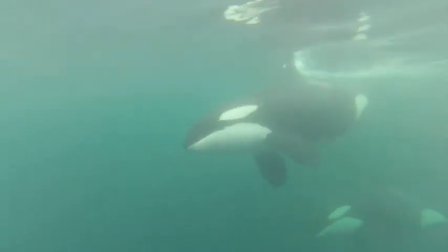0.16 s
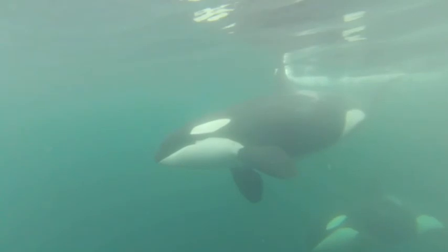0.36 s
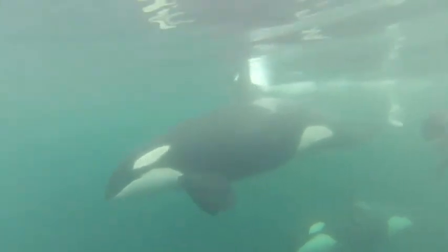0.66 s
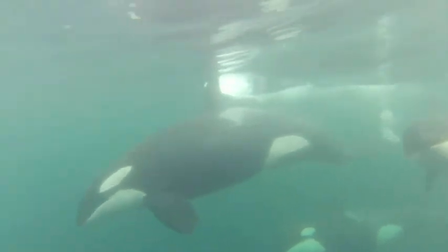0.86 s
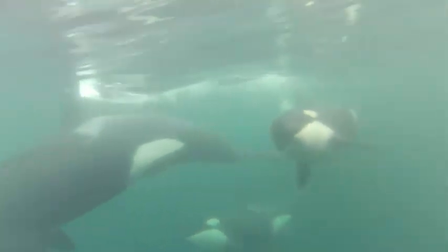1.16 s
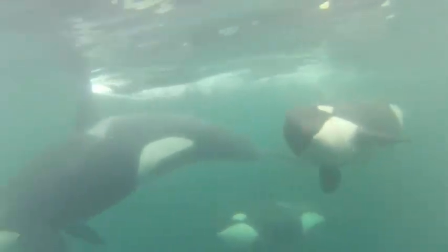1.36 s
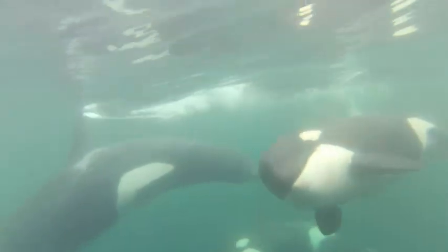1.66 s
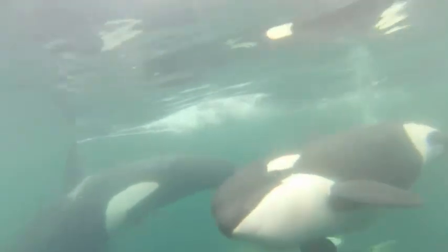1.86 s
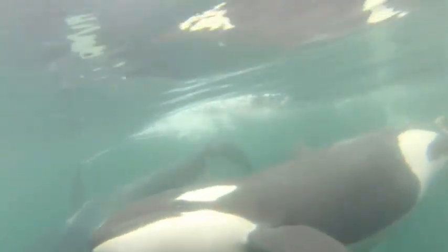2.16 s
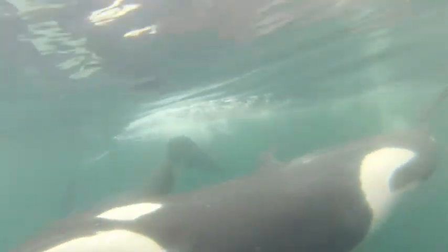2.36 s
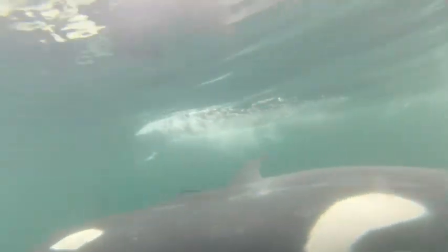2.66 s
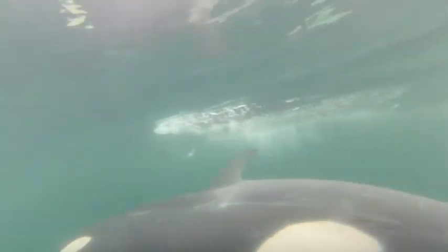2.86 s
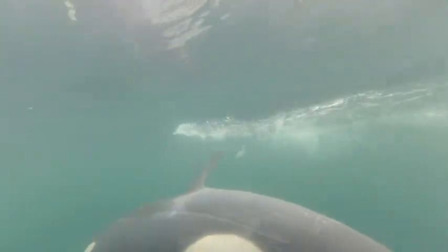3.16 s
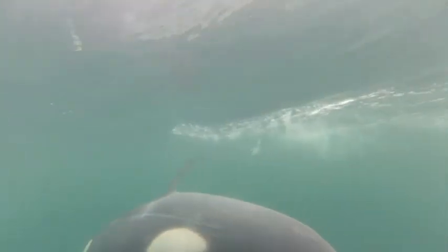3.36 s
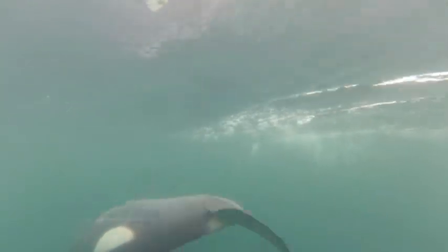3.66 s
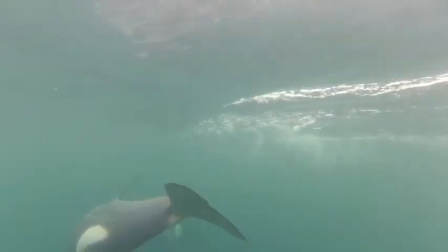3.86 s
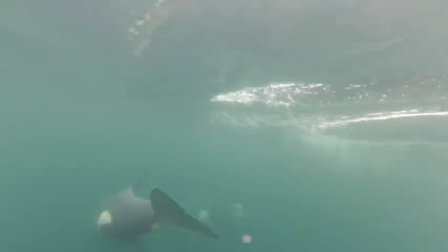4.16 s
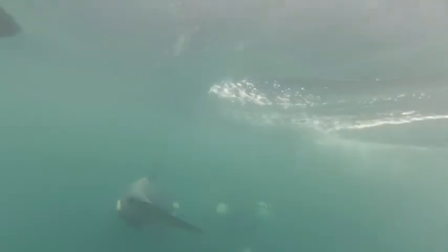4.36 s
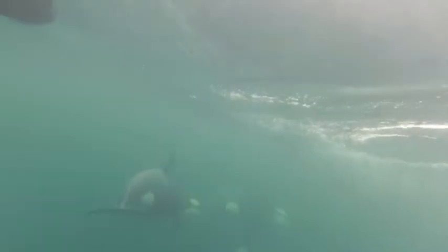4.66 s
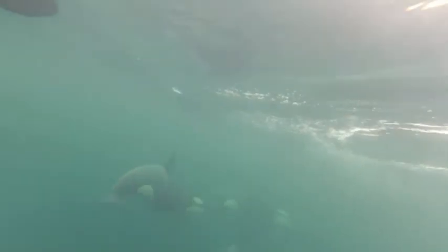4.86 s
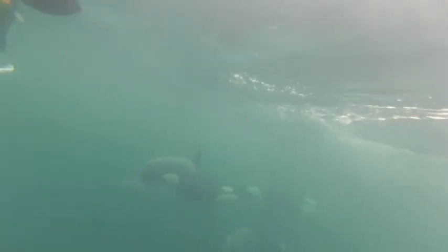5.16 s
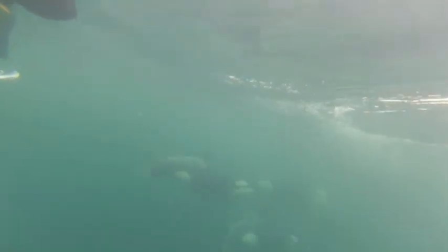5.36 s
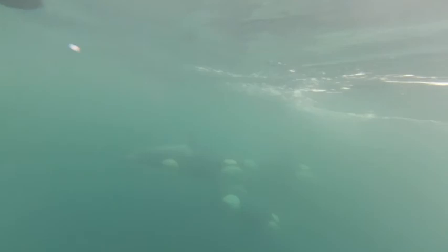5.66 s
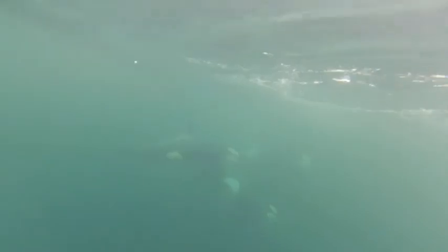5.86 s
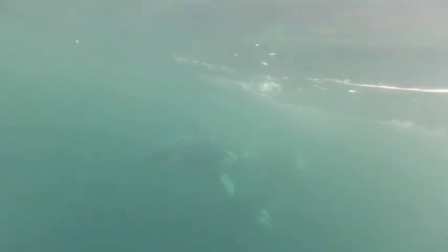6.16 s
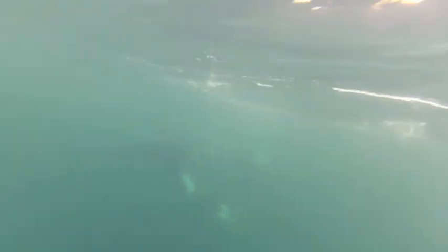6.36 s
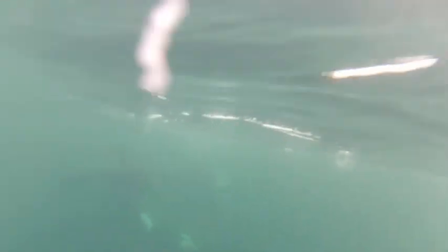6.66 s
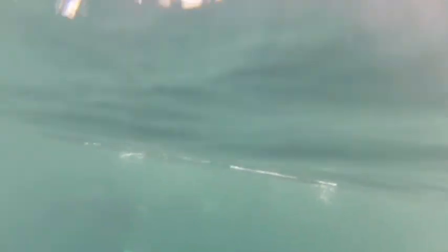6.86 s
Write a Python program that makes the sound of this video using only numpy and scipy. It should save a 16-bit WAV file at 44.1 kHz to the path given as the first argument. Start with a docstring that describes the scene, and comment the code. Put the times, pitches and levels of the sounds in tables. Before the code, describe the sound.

Two overlapping trains of sharp whale clicks quicken and stop, leaving low drumming water, sparse bubbles and knocks before a rattling splash at the surface.

```python
"""Killer whales swim past a small camera in its watertight case, its microphone inside. At first a slow and a fast
sonar train close in, clicks snapping in the treble and ringing the case; then two short far trains pass.
Bubbles pop and knocks land on and off; past the middle two faint whistles glide far off. At the end stray
clicks come and the camera breaks the surface in a rattle of pops, slaps and crackle of swelling, dying sines.
Throughout, filtered noise drums low on the mount and washes the case, and the electronics whine and hiss."""
import sys
import numpy as np
from scipy import signal
from scipy.fft import rfft, irfft
from scipy.io import wavfile
from scipy.ndimage import uniform_filter1d

SR = 44100
rng = np.random.default_rng(int(sys.argv[2]) if len(sys.argv) > 2 else 0)


def wav_record(signal):
    """Record a signal, one row per channel, as 16-bit PCM in the file named by sys.argv[1]."""
    frames = np.transpose(np.atleast_2d(signal))
    bounded = np.clip(frames, -1, 1)
    # unit amplitude maps onto the largest positive 16-bit level
    quanta = np.round(bounded * 32767).astype(np.int16)
    wavfile.write(sys.argv[1], SR, quanta)


N = 309566


def gain_of(db):
    """Decibels to gain."""
    return 10 ** (np.asarray(db) / 20)


def evened(x):
    """Scales to rms 1."""
    return x / np.sqrt(np.mean(x ** 2) + 1e-20)


def level_at(t, points):
    """Straight lines through the points (s, value)."""
    return np.interp(t, *np.transpose(points))


def smooth_noise(size, span):
    """Slow random wander of rms 1, averaged over span samples."""
    return evened(uniform_filter1d(rng.standard_normal(size), span))


def add(mix, s, sound):
    """Mixes a sound in at s seconds."""
    part = mix[max(round(s * SR), 0):][:len(sound)]
    part += sound[:len(part)]


def ring(hz, t60, rise=0.00041, glide=0., size=4000):
    """A dying sine with a soft start; its pitch climbs by the share 2 * glide within t60."""
    t = np.arange(size) / SR
    swell = (1 - np.exp(-t / rise)) ** 2
    return swell * gain_of(-60 * t / t60) * np.sin(2 * np.pi * hz * t * (1 + glide * t / t60))


def swells(peaks, rise_db_per_s, fall_db_per_s):
    """Level in dB that climbs to each peak (s, dB) and sinks after it."""
    t = np.arange(N) / SR
    slopes = [db - np.where(t < s, rise_db_per_s * (s - t), fall_db_per_s * (t - s)) for s, db in peaks]
    return np.max(slopes, axis=0)


# single stray clicks: start_s, snap_db (treble), case_db (ring of the case)
STRAY_CLICKS = [(6.112, -29, -39), (6.148, -32, -33), (6.2124, -29, -37.5), (6.3543, -25.5, -35.5),
                (6.4, -14, -63), (6.4492, -27, -43), (6.6519, -17, -31), (6.7717, -16.5, -37),
                (6.8849, -20.5, -51)]
# the four sonar trains, slow whale, fast whale that ends in a buzz, two short far ones: time_s, clicks_per_s
TRAIN_PACES = [
    [(0.0136, 13.98), (0.31, 13.28), (0.34, 15.15), (0.45, 13.92), (0.64, 17.89), (0.69, 15.86),
     (0.79, 16.61), (0.87, 19.56), (1.12, 16.08), (1.15, 18.6), (1.26, 18.04), (1.66, 19.53), (1.71, 23.46),
     (1.775, 22.83)],
    [(0.1179, 37.59), (0.27, 36.38), (0.49, 42.46), (1.02, 50.68), (1.19, 57.08), (1.31, 65.29),
     (1.34, 62.23), (1.37, 50.94), (1.39, 28.05), (1.42, 44.27), (1.51, 49.16), (1.53, 53.64),
     (1.61, 15.43), (1.63, 33.95), (1.71, 47.53), (1.77, 39.73), (1.8, 45.82), (1.86, 83.64), (1.88, 68.93),
     (1.915, 131.11)],
    [(2.2325, 21.64), (2.335, 22.8), (2.45, 48)],
    [(3.0452, 12.3), (3.28, 22.04), (3.3, 18.62), (3.48, 26.43), (3.584, 23.75)],
]
# loudness of each train as the whale nears, aims and turns away: time_s, snap_db, case_db
TRAIN_LOUDNESS = [
    [(.01, -26, -19.5), (.25, -31.5, -20.5), (.5, -19.5, -17), (1.0, -10.5, -14.5), (1.4, -5.5, -17.5),
     (1.55, -4.5, -16), (1.72, -8.5, -16.5), (1.775, -15, -18.5)],
    [(.12, -28, -70), (.48, -34, -58), (.62, -33, -34.5), (1.05, -28, -37), (1.4, -22, -27.5),
     (1.56, -8.5, -18.5), (1.77, -10.5, -21.5), (1.83, -12, -18.5), (1.915, -37.5, -36)],
    [(2.23, -40, -23), (2.28, -38, -25), (2.33, -55, -35.5), (2.45, -56, -41)],
    [(3.04, -59, -41.5), (3.35, -53, -34), (3.47, -58, -33), (3.585, -62, -41)],
]
# extra ring of four case modes as clicks come from other sides: time_s, knock_db, brightest_db, lowest_db, main_db
CASE_SIDES = [(0, 9, -2, -0.5, 2.5), (.7, 2, 8, -3.5, 1.5), (1.9, 0, 12.5, -6, 3.5),
              (2.2, -11, -15, -16, 1), (3.2, 14, -18, 7, 2.5), (6.1, 13.5, 28, 2, 2.5)]
# resonances of the treble snap: pitch_hz, width_hz, level_db, before each click's own shade
SNAP_RESONANCES = [(5960, 540, -21.5), (7050, 350, -17.5), (8180, 710, -12), (9780, 736, -4.5),
                   (10730, 850, -4.5), (11740, 1590, 9), (13860, 820, -5.5)]
OFF_AXIS, OFF_AXIS_HZ = 0.38, 6500  # dB gained by the snap below this pitch for each dB a click weakens
STRAY_TOP_DB = -9  # stray clicks are duller in the two highest resonances
SNAP_RISE_S, WALL_LAG_S, WALL_SHARE = 0.00016, 0.00043, 0.13


def sonar():
    """Each click is a double treble snap of slightly changing colour, and it rings the case."""
    out = np.zeros(N)
    rows = np.vstack([STRAY_CLICKS, *map(train, TRAIN_PACES, TRAIN_LOUDNESS)])
    snap_hz, width, peak_db = np.transpose(SNAP_RESONANCES)[..., None]
    colours_db = 3 * rng.standard_normal((len(rows), len(snap_hz)))
    colours_db[:len(STRAY_CLICKS), -2:] += STRAY_TOP_DB
    drifts = .02 * rng.standard_normal((len(rows), len(snap_hz), 1))
    rings, hz = case(), np.array(CASE_MODES)[:, 0]
    when, knock_db, bright_db, low_db, main_db = np.transpose(CASE_SIDES)
    # each click shades the modes at random, all but the main one and its neighbour
    shades_db = 2 * rng.standard_normal((len(rows), len(hz))) * (abs(hz - hz[2]) > 100)
    off_axis = 1 - OFF_AXIS * (snap_hz[:, 0] < OFF_AXIS_HZ)
    for (s, snap_db, case_db), colour_db, drift, shade_db in zip(rows, colours_db, drifts, shades_db):
        snaps = gain_of(peak_db) * ring(snap_hz * (1 + drift), 2.284 / width, rise=SNAP_RISE_S, size=600)
        snap = gain_of(snap_db * off_axis + colour_db) @ snaps
        add(out, s + 0.00017, snap)
        add(out, s + 0.00016 + WALL_LAG_S, WALL_SHARE * snap)  # second path, through the case wall
        add(out, s + .0016, .15 * snap)  # a later, weak repeat
        side_db = np.where(hz > 3e3, np.interp(s, when, bright_db), np.interp(s, when, knock_db) * (hz == hz[5]))
        side_db[[0, 2]] = np.interp(s, when, low_db), np.interp(s, when, main_db)
        add(out, s + 0.000067, gain_of(case_db + side_db + shade_db) @ rings)
    return out


def train(pace, loudness):
    """A click at each whole turn of the click rate: rows of start_s, snap_db, case_db."""
    (s, rate), (when, snap_db, case_db) = np.transpose(pace), np.transpose(loudness)
    t = np.arange(s[0], s[-1], 1 / SR)
    turns = np.cumsum(np.interp(t, s, rate)) / SR
    at = np.interp(np.arange(int(turns[-1]) + 1), turns, t)
    return np.transpose([at, np.interp(at, when, snap_db), np.interp(at, when, case_db)])


# modes of the case around the microphone: pitch_hz, swing (inward if negative), t60_s
CASE_MODES = [(300, 0.45, 0.017), (551, -1.825, 0.0074), (620, 0.91, 0.032), (803, 0.024, 0.026),
              (1292, -0.092, 0.023), (1737, -0.161, 0.015), (2370, 0.025, 0.012), (3833, 0.0535, 0.0056)]
BUILD_CYCLES, BUILD_S = .03, .0001  # time constant of the build-up: cycles of the mode, plus seconds


def case():
    """The rings of the case modes, one a row; low modes take longer to build up."""
    return np.array([swing * ring(hz, t60, rise=BUILD_CYCLES / hz + BUILD_S, size=2200)
                     for hz, swing, t60 in CASE_MODES])


# single bubbles at the case: start_s, level_db, pitch_hz
BUBBLES = [(1.216, -25, 778), (2.075, -25, 526), (2.096, -30, 383), (2.915, -43, 2190), (4.292, -45, 1240),
           (4.49, -48, 1370), (4.6003, -36, 468), (4.898, -51, 1710), (5.698, -44, 3680),
           (5.712, -41, 3420), (5.787, -44, 2720), (4.881, -46, 1320), (4.9616, -39.5, 1660),
           (5.5313, -32, 614), (5.606, -39.5, 1760), (5.611, -20.5, 458), (5.7663, -27.5, 630),
           (5.807, -40.5, 3560), (5.978, -21, 355), (6.1499, -31, 615), (6.174, -32, 620), (6.4, -24, 3590),
           (6.4542, -8, 2840), (6.4816, -29, 3530), (6.494, -24, 630), (6.4983, -11.5, 6860),
           (6.5165, -11, 7400), (6.5225, -16, 3700), (6.5424, -21, 3250), (6.5575, -16.5, 2260),
           (6.5868, -26, 3760), (6.6426, -16, 2430), (6.661, -16.5, 6870), (6.6651, -15, 3330),
           (6.687, -22, 2870), (6.7, -28, 2420), (6.7135, -33, 1200), (6.7433, -26, 3370),
           (6.799, -21, 1310), (6.821, -34.5, 2840), (6.8654, -18.5, 2310)]
CRACK_HZ, CRACK_DB_PER_OCTAVE = 1500, 4.5  # bubbles below this pitch crack and jolt less


def pops():
    """Small bubbles ring higher and shorter; each swells over a few cycles inside a broad crack of
    brief neighbours, beats unevenly, and jolts the case."""
    rows = BUBBLES + slap_pops()
    out, jolt = np.zeros(N), case().sum(0)
    chance = rng.uniform(-1.8, 1, (len(rows), 7, 2))
    beats, t = rng.random(len(rows)), np.arange(2500) / SR
    for (s, db, hz), neighbours, pace in zip(rows, chance, beats):
        rasp = 1 + 0.35 * np.cos(2 * np.pi * 0.135 * (1 + pace) * hz * t)
        t60 = 0.018 * (hz / 2000) ** -.75
        soft_db = CRACK_DB_PER_OCTAVE * min(np.log2(hz / CRACK_HZ), 0)
        bubble = rasp * ring(hz, t60, rise=.65 / hz, glide=.14, size=2500)
        add(out, s - 1.2 / hz, gain_of(db) * bubble)
        add(out, s, gain_of(db - 34.0 + soft_db) * jolt)
        for detune, late in neighbours:
            brief = ring(hz * 1.956 ** detune, 0.53 * t60, rise=0.027 / hz, size=1200)
            lag_s = 1.9 * (1 + late) ** 2 / hz
            add(out, s + lag_s, gain_of(db - 17.5 + soft_db - 0.36 * late) * brief)
    return out


# slaps of water at the surface: start_s, level_db, pitch_hz, partner_db (lower pop), thump_db (main case mode)
WATER_SLAPS = [(6.509, -7, 1617, -37, -15), (6.5762, -15.5, 2160, -24, -22), (6.6054, -17, 2290, -32, -31),
               (6.6264, -16.5, 2430, -25, -28), (6.6672, -11, 2154, -15.5, -34),
               (6.7204, -24, 2140, -20, -53.5), (6.7286, -4.5, 2070, -17, -32.5),
               (6.7366, -22, 1906, -12.5, -57), (6.75, -5.5, 1940, -13, -52), (6.7624, -20, 2195, -19, -47),
               (6.7772, -18, 2430, -38, -55)]
PARTNER_PITCH, PARTNER_LAG_S = 0.532, 0.00061  # the partner rings near half the pitch


def slap_pops():
    """Each slap as two pops, the second lower: rows of start_s, level_db, pitch_hz."""
    return [pop for s, db, hz, partner_db, _ in WATER_SLAPS
            for pop in [(s, db, hz), (s + PARTNER_LAG_S, partner_db, PARTNER_PITCH * hz)]]


def slap_thumps():
    """Each slap sets the main case mode ringing."""
    out = np.zeros(N)
    for s, *_, thump_db in WATER_SLAPS:
        add(out, s, gain_of(thump_db) * ring(CASE_MODES[2][0], 0.065, rise=0.00036))
    return out


# bursts of crackle from tiny bubbles: peak_s, level_db
FIZZ_BURSTS = [(4.9, -59), (5.76, -54.5), (6.52, -40), (6.73, -33.5)]
FIZZ_RISE_DB_PER_S, FIZZ_FALL_DB_PER_S = 412, 351


def fizz():
    """Many tiny bursts of a few cycles each, of scattered size, at sixteen pitches."""
    out = np.zeros(N)
    for hz in np.geomspace(1000, 5500, num=16):
        struck = rng.random(N) < 30 / SR  # about 30 a second at each pitch
        size = gain_of(2.5 * np.minimum(rng.exponential(1, N), 4)) * struck
        burst = ring(hz, 12 / hz, rise=.4 / hz, size=800) * (hz / 2000) ** -.5
        out += signal.oaconvolve(size, burst)[:N]
    return gain_of(swells(FIZZ_BURSTS, FIZZ_RISE_DB_PER_S, FIZZ_FALL_DB_PER_S)) * evened(out)


# dull knocks on the mount: start_s, level_db, pitch_hz, boom_db (low boom above the knock)
MOUNT_KNOCKS = [(1.2133, -13, 275, 6.5), (2.068, -29, 282, -5), (2.741, -34, 248, 14),
                (2.908, -40.5, 310, -9), (4.44, -35.5, 222, -33), (4.806, -37.5, 250, 1),
                (5.176, -44.5, 300, 10), (5.937, -28, 257, 4.5), (6.661, -26, 300, 6)]


def knocks():
    """A short thud, then the upper mount mode booms."""
    out = np.zeros(N)
    for s, db, hz, boom_db in MOUNT_KNOCKS:
        add(out, s, gain_of(db) * ring(hz, 0.067, rise=0.000074))
        add(out, s + 0.0023, gain_of(db + boom_db) * ring(MOUNT_MODES[1][0], 0.25, rise=0.0039))
    return out


# far whistles, one list each: time_s, pitch_hz, level_db
FAR_WHISTLES = [
    [(4.545, 7000, -73), (4.632, 7690, -69), (4.69, 7250, -70), (4.745, 6520, -72), (4.8, 6500, -73)],
    [(4.805, 6650, -66), (4.84, 7450, -67), (4.87, 7730, -70), (4.945, 7520, -66)],
]
# thin squeaks: start_s, length_s, start_hz, end_hz, start_db, end_db
THIN_SQUEAKS = [(.425, .05, 1380, 1250, -51, -53), (3.42, .03, 1760, 1860, -47, -64),
                (3.461, .03, 1790, 1870, -46, -66), (4.45, .16, 2680, 2620, -71, -69),
                (4.62, .07, 680, 560, -45, -46), (5.565, .12, 2580, 2660, -66, -65),
                (5.73, .04, 1350, 1230, -60, -58), (6.32, .03, 1260, 1200, -54, -60)]
WAVER_HZ = 22  # rms unsteadiness of the pitch


def whistles():
    """Thin gliding tones of wavering pitch; the far whistles carry a faint octave."""
    out = np.zeros(N)
    squeaks = [[(s, hz, db), (s + length, end_hz, end_db)] for s, length, hz, end_hz, db, end_db in THIN_SQUEAKS]
    octaves = [.2] * len(FAR_WHISTLES) + [0] * len(squeaks)
    for rows, octave in zip(FAR_WHISTLES + squeaks, octaves):
        s, hz, db = np.transpose(rows)
        t = np.arange(s[0], s[-1], 1 / SR)
        pitch = np.interp(t, s, hz) + WAVER_HZ * smooth_noise(len(t), 300)
        turn = 2 * np.pi * np.cumsum(pitch) / SR
        tone = np.sin(turn) + octave * np.sin(2 * turn)
        add(out, s[0], gain_of(np.interp(t, s, db)) * tone * signal.windows.tukey(len(t), .3))
    return out


# flow drumming on the mount, a list for the lower and one for the upper mode: time_s, level_db
DRUM_LEVELS = [
    [(0.0, -28.5), (0.52, -29), (0.76, -34), (1.01, -27.5), (1.3, -28.5), (1.71, -35), (1.83, -23.5),
     (2.31, -29.5), (2.76, -25.5), (2.92, -34), (3.52, -31), (3.83, -42), (3.98, -34), (4.66, -39.5),
     (5.14, -36), (5.79, -23.5), (6.0, -35), (6.19, -21.5), (6.48, -45.5), (6.67, -32)],
    [(0.0, -35), (1.01, -42.5), (1.15, -36), (1.71, -34), (2.31, -39), (3.9, -44.5), (5.14, -46.5),
     (6.19, -39.5), (6.67, -31.5), (7.01, -41.5)],
]
# the two modes of the mount: pitch_hz, width_hz (sets the filters' decay)
MOUNT_MODES = [(36, 10), (82, 14)]


def drum():
    """Turbulence drives the two mount modes; the drive is steady enough that the swing seldom dies out."""
    t, out = np.arange(N) / SR, np.zeros(N)
    for (hz, width), level in zip(MOUNT_MODES, DRUM_LEVELS):
        r = np.exp(-np.pi * width / SR)
        swing = rng.standard_normal((N, 2)) @ [1, 1j]
        for _ in range(2):
            swing = signal.lfilter([1], [1, -r], swing)
        swing = swing / abs(swing) ** .45  # evens out strong and weak moments
        for _ in range(2):
            swing = signal.lfilter([1], [1, -r ** 3], swing)
        tone = (swing * np.exp(2j * np.pi * hz * t)).real
        out += gain_of(level_at(t, level)) * evened(tone)
    return out


# colour of the water wash through the case and of the hiss: pitch_hz, relative level_db (per Hz)
WASH_COLOUR = [(50, -10), (110, -18.5), (160, -29), (380, -33), (540, -33), (615, -25.5), (800, -42.5),
               (1100, -50.5), (1290, -42.5), (1530, -50), (1800, -45), (2300, -49.5), (9400, -59.5),
               (11000, -56), (13300, -64), (14500, -62), (15400, -72)]
# level of the wash above 420 Hz: time_s, level_db
UPPER_WASH_LEVEL = [(0, -37), (1.7, -32), (1.95, -43), (3.7, -44.5), (7.02, -43)]
# level of the wash below 420 Hz: time_s, level_db
LOW_WASH_LEVEL = [(0, -39), (1.0, -46.5), (1.7, -33), (2.0, -42.5), (3.4, -43), (4.0, -46), (5.2, -44),
                  (7.02, -42.5)]
# blurred gurgles that lift the wash in the upper case modes: peak_s, lift_db
GURGLES = [(4.65, 7), (5.76, 9), (6.17, 6), (6.3, 7)]
GURGLE_DB_PER_S = 136  # rise and fall
LUMPS_DB, GURGLE_LUMPS = 2.6, .45  # rms unevenness of the wash, and its growth per dB of gurgle
HISS_DB = -66


def wash():
    """Water noise through the case, each band lumping on its own, over the even hiss of the electronics."""
    t, (f, db) = np.arange(N) / SR, np.transpose(WASH_COLOUR)
    low = 1 / (1 + (f / 2500) ** 4)  # share of water in the colour; the rest is hiss
    spectrum = rfft(coloured(np.transpose([f, db + 10 * np.log10(low)])))
    hz, water = np.fft.rfftfreq(N, 1 / SR), np.zeros(N)
    gurgle_db = np.maximum(swells(GURGLES, GURGLE_DB_PER_S, GURGLE_DB_PER_S), 0)
    for lo, hi in [(0, 420), (420, 1000), (1000, 1530), (1530, 2200), (2200, SR)]:
        lumps = evened(uniform_filter1d(uniform_filter1d(rng.standard_normal(N), 700), 700))
        lift_db = (500 < lo < 2000) * gurgle_db  # the bands from 1000 to 2200 Hz
        level_db = level_at(t, UPPER_WASH_LEVEL if lo else LOW_WASH_LEVEL)
        uneven_db = (LUMPS_DB + GURGLE_LUMPS * lift_db) * lumps
        band = irfft(spectrum * (hz >= lo) * (hz < hi), N)
        water += band * gain_of(uneven_db + lift_db + level_db)
    hiss = coloured(np.transpose([f, db + 10 * np.log10(1 - low + 1e-9)]))
    return water + gain_of(HISS_DB) * hiss


def coloured(points):
    """Noise of rms 1 with the spectrum of the points (Hz, dB)."""
    f, db = np.transpose(points)
    hz = np.fft.rfftfreq(N, 1 / SR)
    shape = gain_of(np.interp(np.log(hz + 1), np.log(f), db))
    return evened(irfft(rfft(rng.standard_normal(N)) * shape, N))


# whine of the electronics: multiple of the base pitch, level_db
WHINE_TONES = [(2, -81), (4, -76), (5, -81)]
WHINE_HZ, WHINE_WANDER_HZ = 2822, 10  # base pitch and its rms wander
BLINKS_PER_S, BLINK_S, BLINK_OFF = 9.9, 3.88, -.45  # rate, middle of one blink, cosine below which it is off
WHINE_PAUSE_S = (2.76, 3.68)


def whine():
    """Faint fuzzy tones that blink on and off, with one longer pause."""
    t = np.arange(N) / SR
    blink = np.cos(2 * np.pi * BLINKS_PER_S * (t - BLINK_S)) > BLINK_OFF
    outside_pause = (t < WHINE_PAUSE_S[0]) | (t > WHINE_PAUSE_S[1])
    turn = 2 * np.pi * np.cumsum(WHINE_HZ + WHINE_WANDER_HZ * smooth_noise(N, 200)) / SR
    tones = sum(gain_of(db) * np.sin(k * turn) for k, db in WHINE_TONES)
    return uniform_filter1d((blink & outside_pause) * 1., size=300) * tones


MURK_DB, MURK_T60_S = -15, 0.017


def murk(sharp):
    """A short dull tail from the surface and the bodies around: smoothed, dying noise."""
    t = np.arange(4000) / SR
    tail = uniform_filter1d(rng.standard_normal(4000), size=6) * gain_of(-60 * t / MURK_T60_S) * (t > .002)
    return gain_of(MURK_DB) * signal.oaconvolve(sharp, tail / np.linalg.norm(tail))[:N]


def scene():
    """Clicks, pops, slaps and crackle get the murky tail; the other layers stay plain."""
    sharp = sonar() + pops() + slap_thumps() + fizz()
    return (sharp + murk(sharp) + knocks() + whistles() + drum() + wash() + whine())[None]


EDGE_HZ = 16300


def record(dry):
    """The band limit of the recorder, a steep low-pass."""
    return signal.oaconvolve(dry, signal.firwin(255, EDGE_HZ, window=("kaiser", 9), fs=SR)[None], "same")


dry = scene()
out = record(dry)
wav_record(out)
```